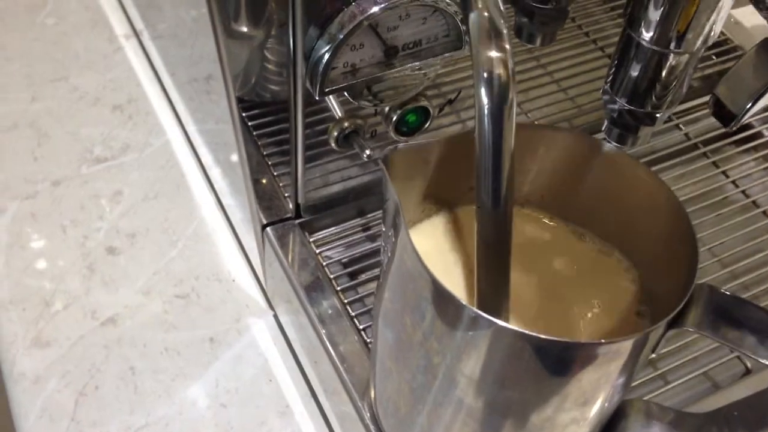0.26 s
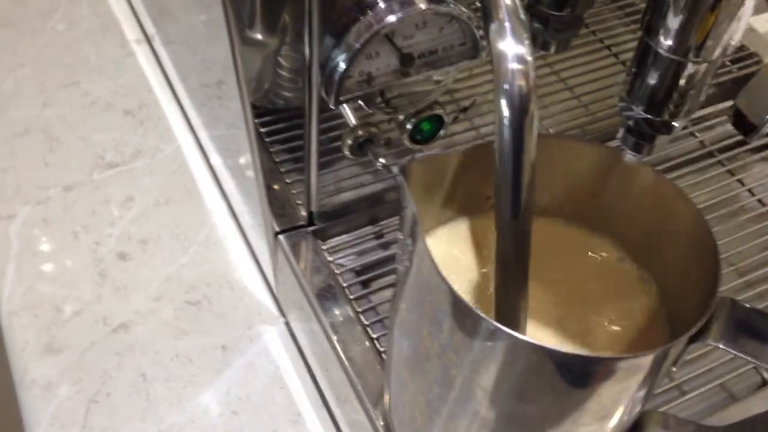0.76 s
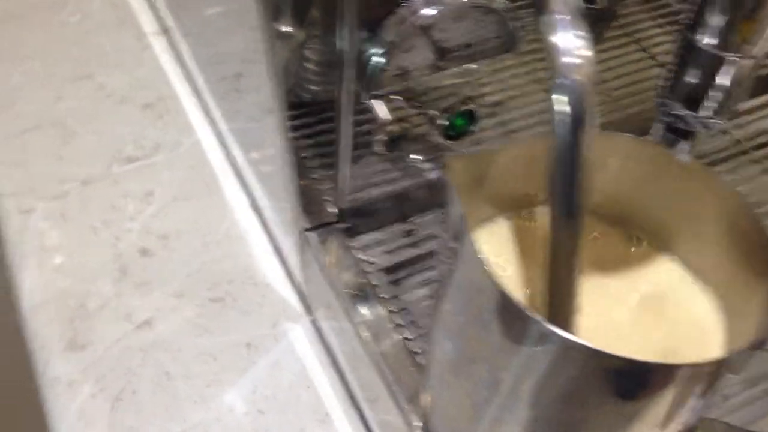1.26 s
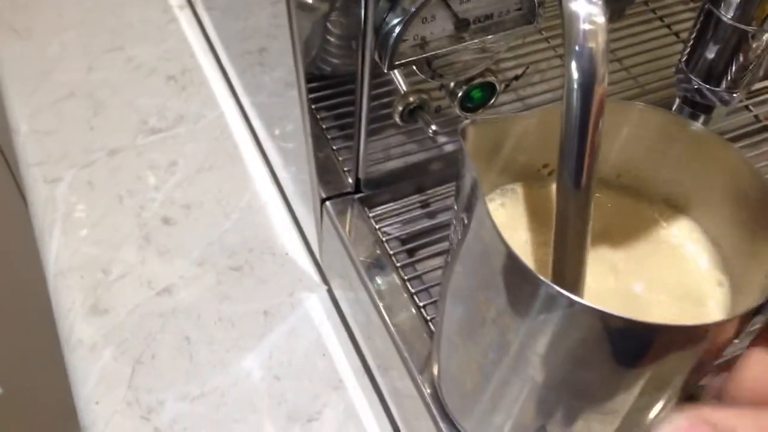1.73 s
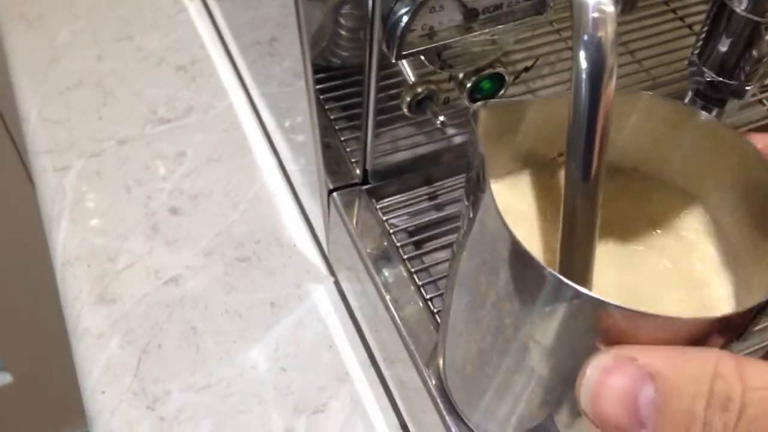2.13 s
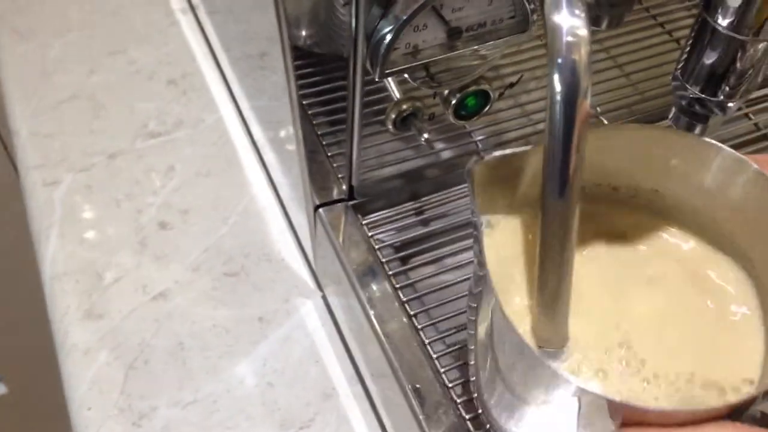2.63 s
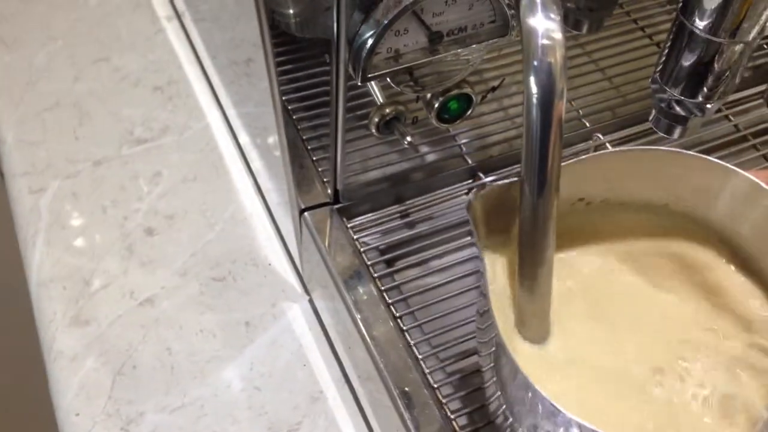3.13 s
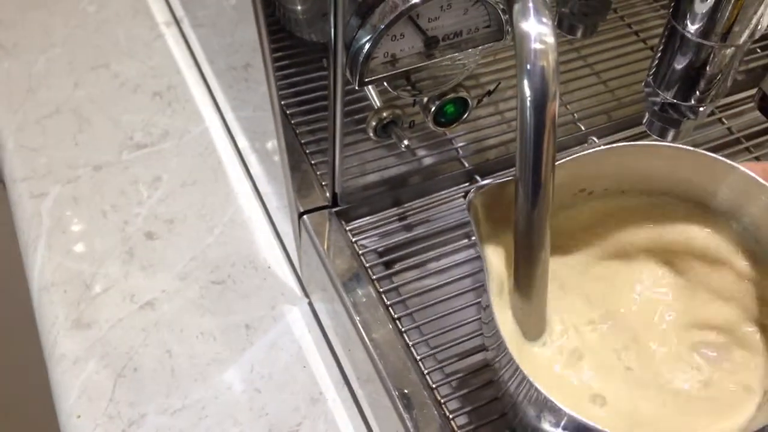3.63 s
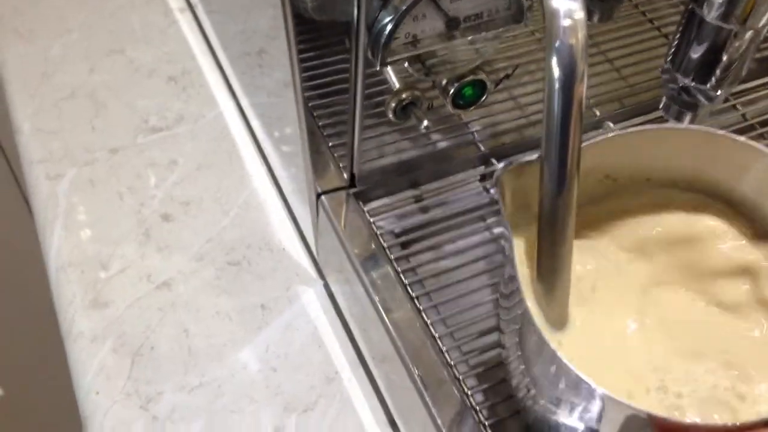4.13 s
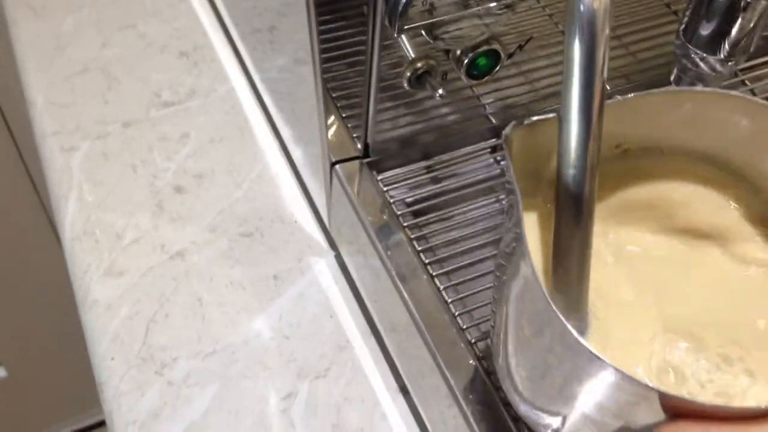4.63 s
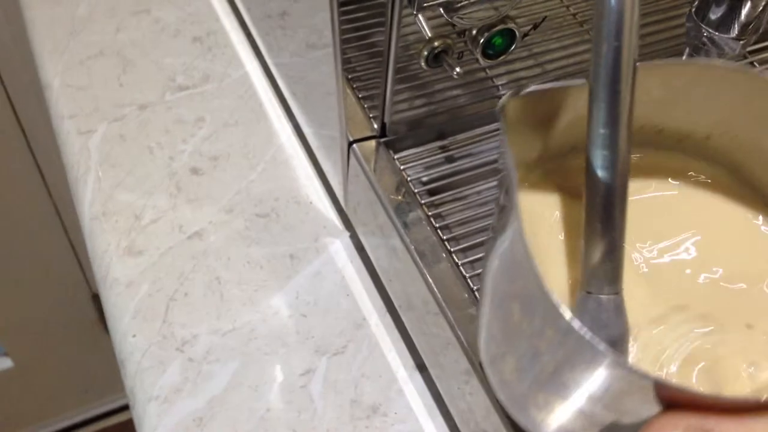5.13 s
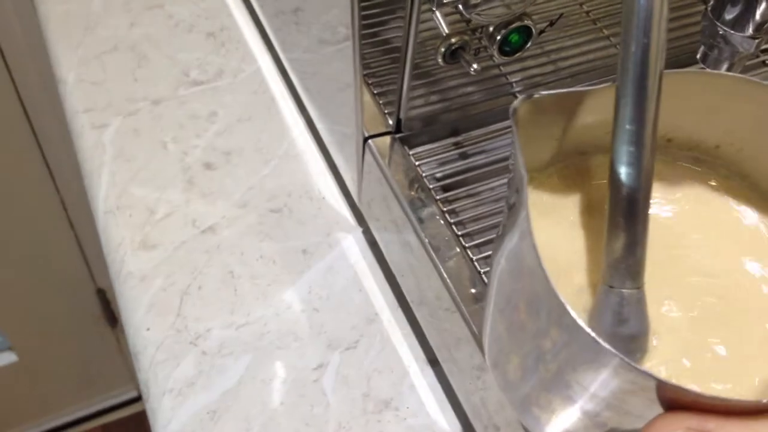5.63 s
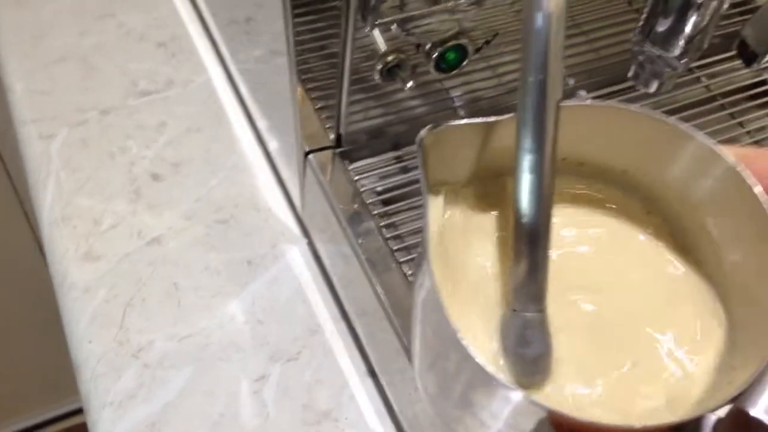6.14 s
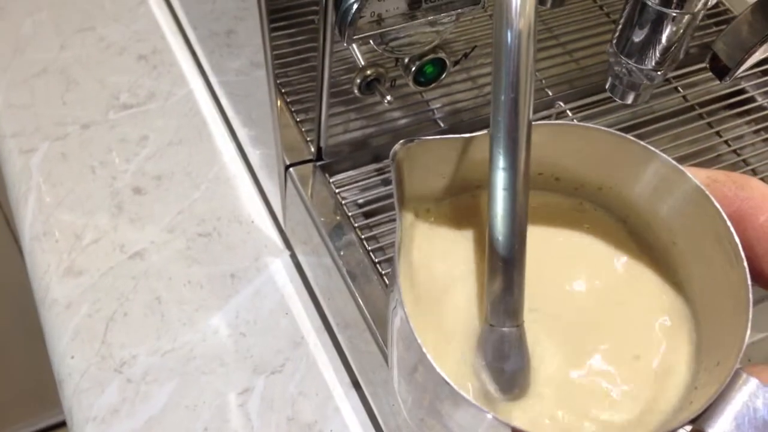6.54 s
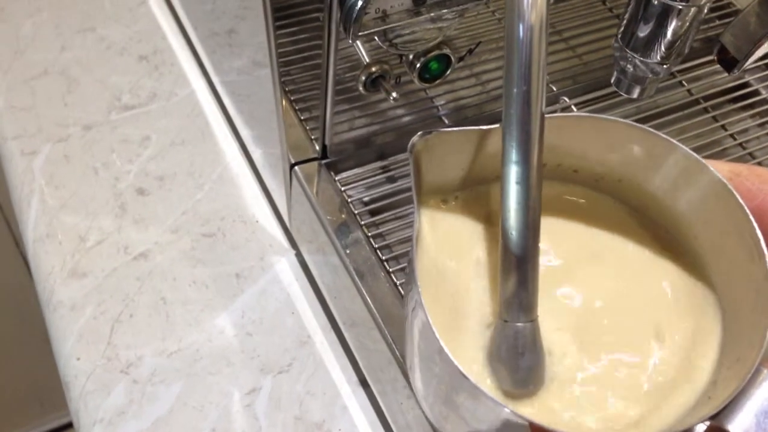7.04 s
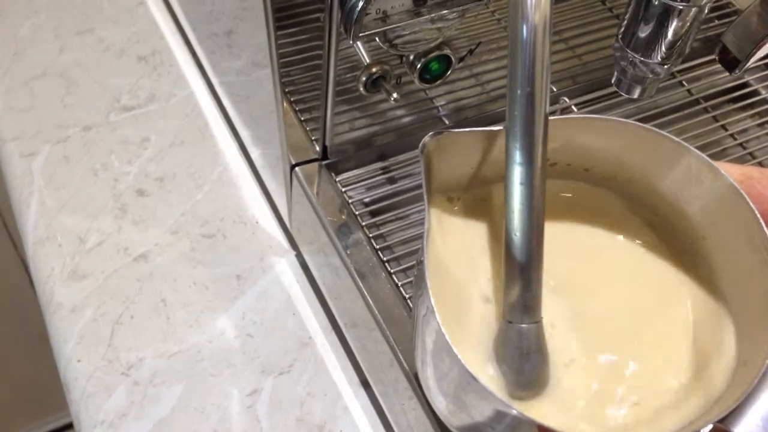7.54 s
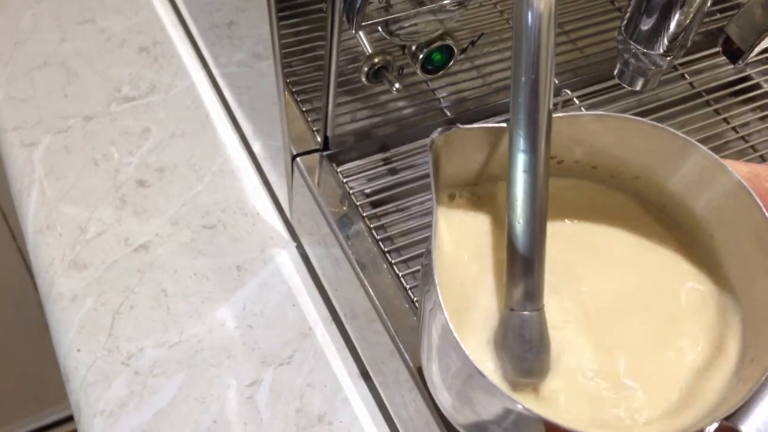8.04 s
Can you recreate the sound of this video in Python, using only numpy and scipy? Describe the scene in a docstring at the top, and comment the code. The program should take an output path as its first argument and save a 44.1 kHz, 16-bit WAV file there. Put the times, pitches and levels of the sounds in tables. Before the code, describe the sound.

Loud steam hisses and shrieks in a metal jug of milk, ringing unevenly around mid and high pitches, fluttering and spluttering. Near five seconds it falters, whistles for a tenth of a second, and abruptly turns into an even, damped sizzle. Irregular crisp tearing crackles and tiny squeaky gurgles follow while the sizzle slowly fades a little. Recorded close with a small microphone, short hard room reflections, faint low hum behind.

```python
"""A kitchen, close up: a steam wand heats milk in a steel pitcher.
Random clicks of collapsing bubbles excite the pitcher's resonances: a sputtering screech with jet hiss,
while noise churns below, short squeals break out and faint low tones waver in the background.
After five seconds, just past a brief whistle, the screech gives way to a foam-muffled sizzle, and
bursts of bright crackle follow as the tip gulps air. Close echoes and a short tail set it in the room."""
import sys
import numpy as np
from scipy import signal
from scipy.fft import rfft, irfft
from scipy.io import wavfile
from scipy.ndimage import uniform_filter1d, minimum_filter1d, map_coordinates

SR = 44100
rng = np.random.default_rng(int(sys.argv[2]) if len(sys.argv) > 2 else 0)


def generate_wav(sig):
    """Save sig (samples, or channels by samples) to the path in sys.argv[1] as 16-bit PCM at SR."""
    pcm = np.round(np.clip(np.atleast_2d(sig).T, -1, 1) * 32767).astype(np.int16)
    wavfile.write(sys.argv[1], SR, pcm)


N = 365148
TIME = np.arange(N) / SR
FOAM_S = 5.215  # foam closes over the tip


def gain_of(db):
    """Decibels to amplitude."""
    return 10 ** (np.asarray(db) / 20)


def evened(x):
    """Scales to an rms of 1."""
    return x / np.sqrt(np.mean(x ** 2) + 1e-20)


def steadied(x):
    """Holds the rms near 1 over about a fifth of a second and leaves faster flutter in."""
    power = np.abs(uniform_filter1d(x ** 2, size=8000))
    return x / np.sqrt(power + 1e-20)


def curves(rows):
    """Each column of a table after the time, joined by straight lines."""
    s, *columns = np.transpose(rows)
    return [np.interp(TIME, s, column) for column in columns]


def swells(rows):
    """Bell-shaped rises or dips in level [dB], from rows of (centre [s], length [s], level [dB])."""
    return sum(db * np.exp(-(2 * (TIME - s) / length) ** 2) for s, length, db in rows)


def sinking(start, end):
    """A straight glide from the start until the foam closes over the tip."""
    return np.interp(TIME, [0, FOAM_S], [start, end])


def foam():
    """How far the foam has closed over the tip, 0-1."""
    return np.interp(TIME, [FOAM_S - .01, FOAM_S + .01], [0, 1])


def add(mix, s, sound):
    """Mixes a sound in at a time [s]."""
    part = mix[max(round(s * SR), 0):][:len(sound)]
    part += sound[:len(part)]


def wander(rate_hz):
    """A smooth random drift with an rms of 1, from noise with its faster motion removed."""
    spectrum = rfft(rng.standard_normal(N))
    hz = np.fft.rfftfreq(N, 1 / SR)
    return evened(irfft(spectrum * np.exp(-(hz / rate_hz) ** 2), N))


def flutter(slow_hz, fast_hz, depth_db):
    """A random gain that varies between two rates; the depth is its rms in dB."""
    band = signal.butter(2, [slow_hz, fast_hz], "bandpass", fs=SR, output="sos")
    return gain_of(depth_db * evened(signal.sosfilt(band, rng.standard_normal(N))))


def collapses(per_s, spread_db, wash):
    """Clicks of imploding bubbles, a few of them large, over a wash of countless small ones."""
    size = gain_of(spread_db * np.minimum(rng.exponential(1, N), 4))
    struck = rng.random(N) < per_s / SR
    clicks = size * np.sign(rng.standard_normal(N)) * struck
    return evened(evened(clicks) + wash * rng.standard_normal(N))


def coloured(x, spectrum, size=2048):
    """Minimum-phase filter with the given spectrum (Hz, relative dB); the result has an rms of 1."""
    hz, db = np.transpose(spectrum)
    bin_hz = abs(np.fft.fftfreq(size, 1 / SR))
    log_gain = np.log(gain_of(np.interp(np.log(bin_hz + 1), np.log(hz), db)))
    # the Hilbert transform of the log gain supplies the phase that makes the filter causal
    taps = np.fft.ifft(np.exp(np.conj(signal.hilbert(log_gain)))).real
    return evened(signal.oaconvolve(x, taps[:size // 2])[:len(x)])


def patchy(x, patch_db):
    """The colour of churned liquid keeps changing: random patches some 700 Hz wide and 50 ms long."""
    z = signal.stft(x, nperseg=256)[2]
    field = rng.standard_normal(z.shape)
    field = uniform_filter1d(field, size=4, axis=0)
    field = uniform_filter1d(field, size=16, axis=1)
    return evened(signal.istft(z * gain_of(patch_db * evened(field)), nperseg=256)[1][:N])


def resonate(x, hz, width):
    """A steep two-pole resonance that can follow a moving pitch: shift down, smooth, shift back up."""
    turn = np.exp(2j * np.pi * np.cumsum(hz * np.ones(len(x))) / SR)
    r = np.exp(-np.pi * width / SR)
    smooth = signal.lfilter([(1 - r) ** 2], [1, -2 * r, r * r], x / turn)
    return 2 * (turn * smooth).real


def notch(x, hz, width, depth):
    """A resonance, taken away, leaves a dip that can move."""
    turn = np.exp(2j * np.pi * np.cumsum(hz) / SR)
    r = np.exp(-np.pi * width / SR)
    resonance = 2 * (turn * signal.lfilter([1 - r], [1, -r], x / turn)).real
    return x - np.clip(depth, 0, 1) * resonance


def ring(x, hz, modes):
    """Resonances (multiple, width [Hz], level [dB]) that move together and each waver a little."""
    out = 0
    for k, (ratio, width, db) in enumerate(modes):
        pitch = hz * ratio * (1 + .014 * wander(12))
        # each mode hears the drive 60 samples later than the one before
        out = out + gain_of(db) * resonate(np.roll(x, 60 * k), pitch, width)
    return out


def above(x, hz):
    """A steep high-pass, as the pitcher's narrow mouth radiates little of the lows."""
    return signal.sosfilt(signal.butter(8, hz, "highpass", fs=SR, output="sos"), x)


def screech():
    """The steam cavity sputters in thin milk; its collapses ring the pitcher until foam damps them."""
    # as the tip sinks, layer levels: (time [s], lowest resonance [dB], second resonance [dB],
    # roar of collapsing bubbles [dB], jet hiss [dB])
    layer_levels = [(0, -23, -24, -23.5, -19.5), (.35, -19.5, -37, -23, -22), (.7, -25.5, -25, -19, -18.5),
                    (1.3, -34.5, -40, -20.5, -22.5), (1.9, -27.5, -29, -18.5, -23),
                    (2.3, -32.5, -45, -23, -23), (2.7, -26, -57, -17, -22.5),
                    (3.05, -21.5, -27.5, -22.5, -18.5), (3.45, -21.5, -28, -21.5, -19),
                    (3.9, -25.5, -28, -23, -21), (4.3, -21, -24.5, -21, -19), (4.65, -20, -22, -27.5, -19),
                    (4.95, -24, -22.5, -25.5, -19.5), (5.2, -28, -21.5, -28, -19.5)]
    # shifting as the pitcher is lifted: (time [s], lowest resonance [Hz], third resonance [Hz],
    # pitch of the bubbles [Hz], nozzle tone [Hz])
    pitch_path = [(0, 1420, 2160, 2180, 4400), (.2, 1638, 2240, 2180, 4980), (.45, 1705, 2290, 2190, 4730),
                  (.7, 1516, 2320, 2230, 4960), (.95, 1380, 2330, 2400, 5030),
                  (1.4, 1488, 2225, 2800, 4800), (1.9, 1465, 2375, 2670, 4780),
                  (2.15, 1387, 2360, 2680, 4750), (2.7, 1387, 2260, 2740, 5200),
                  (3.15, 1410, 2554, 2770, 4500), (3.5, 1395, 2455, 2720, 4640),
                  (3.9, 1410, 2340, 2300, 5000), (4.15, 1333, 2380, 2210, 4900),
                  (4.55, 1300, 2255, 2140, 4390), (5.2, 1260, 2250, 2100, 4480)]
    # the pitcher's upper ring: (multiple of the third resonance, width [Hz], relative level [dB])
    upper_modes = [(0.996, 232, 5), (1.12, 264, -5.5), (1.245, 240, 3.5), (1.36, 287, -1.5)]
    # colour of the jet hiss: (frequency [Hz], relative level [dB])
    jet_spectrum = [(80, -39), (400, -35.5), (1100, -25), (1600, 7), (2200, 7), (3100, -0.5), (3550, 5.5),
                    (4100, 3), (5800, -1), (6300, 0), (7000, 2.5), (7700, 0), (8300, -4.5), (9500, -3.5),
                    (11500, -9.5), (15300, -14)]
    # an echo off the milk surface cancels one band of the steam: (time [s], centre [Hz], depth [0-1])
    hollow_path = [(0, 3800, 0), (.35, 3500, 0.4), (.95, 3550, 0.47), (1.4, 3930, 0), (2.2, 4000, 0.2),
                   (2.75, 3550, 1), (3.3, 3600, 0.8), (4.0, 3750, 0.55), (4.7, 3500, 0.73),
                   (5.2, 4050, 0.65)]
    # the jet flares and the nozzle sings out: (centre [s], length [s], rise of the nozzle tone [dB])
    flare_rows = [(.33, 0.12, 3.5), (.49, .07, 6), (.68, 0.056, 8), (.926, 0.14, 10), (1.139, 0.047, 4.5),
                  (1.393, 0.029, 6.5), (1.9, .09, 6), (2.09, 0.12, 8), (3.08, 0.087, 6.5), (3.265, 0.13, 4),
                  (3.61, .06, 4), (3.975, 0.029, 9.5), (4.55, 0.11, 7), (5.146, 0.041, 7)]
    # clumps of large bubbles thump the two low resonances: (centre [s], length [s], rise [dB])
    splutter_rows = [(.113, 0.026, 8), (.413, 0.085, 7), (1.137, 0.041, 5), (1.482, 0.063, 3.5),
                     (2.04, 0.04, 9), (2.369, 0.12, 6.5), (.72, 0.027, 3), (2.86, 0.048, 4.5),
                     (3.149, .08, 2.5), (3.345, 0.021, 8.5), (3.69, 0.084, 3), (3.82, 0.026, 5),
                     (4.114, 0.047, 3.5), (4.55, 0.054, 2.5), (4.767, 0.013, 2.5), (4.835, 0.024, 8.5),
                     (4.88, .02, 6), (5.209, 0.012, 9.5)]
    low_width_hz, second_width_hz = 114, 170  # how sharply the two low resonances ring
    nozzle_db = -26.5  # the nozzle's steady singing between flares
    flare_hiss = 0.24  # share of a flare's dB that the hiss follows

    low_db, second_db, roar_db, jet_db = curves(layer_levels)
    low_hz, third_hz, bubble_hz, nozzle_hz = curves(pitch_path)
    hollow_hz, hollow_depth = curves(hollow_path)
    flare_db, splutter_db = swells(flare_rows), swells(splutter_rows)

    sputter = flutter(11.8, 78, depth_db=1.4)
    drive = collapses(per_s=3500, spread_db=1.0, wash=1.0) * sputter
    throb = drive * flutter(10, 100, depth_db=2.3)  # the largest bubbles come in clumps

    low_pitch = low_hz * (1 + 0.0057 * wander(24))
    low = above(resonate(throb, low_pitch, low_width_hz), 1290)
    # the second resonance climbs; its opposite sign leaves a hollow between the two
    second = above(resonate(-throb, sinking(1716, 1837), second_width_hz), 1050)

    bubbles = patchy(resonate(drive, bubble_hz, 1730), patch_db=1.0)
    roar = above(ring(bubbles, third_hz, upper_modes), 1880)

    nozzle_drive = drive * flutter(7.1, 57, depth_db=3.0)
    nozzle_pitch = nozzle_hz * (1 + 0.034 * wander(26))
    nozzle = above(resonate(nozzle_drive, nozzle_pitch, 560), 3030)

    jet_drive = collapses(per_s=6000, spread_db=2.5, wash=0.74) * sputter
    jet = patchy(coloured(jet_drive, jet_spectrum), patch_db=3.0)

    layers = [(low, low_db + splutter_db), (second, second_db + splutter_db), (roar, roar_db),
              (nozzle, nozzle_db + flare_db), (jet, jet_db + flare_hiss * flare_db)]
    steam = sum(gain_of(db) * steadied(sound) for sound, db in layers)
    steam = notch(steam, hollow_hz, 480, hollow_depth)
    # a dip just above the lowest resonance moves with it and deepens
    steam = notch(steam, 1.185 * low_hz, 170, sinking(.25, .65))
    return steam * (1 - foam())


def squeals(glide=-0.0318):
    """A cloud of like-sized bubbles rings together for a moment, wavering and sagging in pitch."""
    # squeals and gurgles: (time [s], length [s], pitch [Hz], nominal width [Hz], level [dB])
    squeal_rows = [(0, .03, 3350, 260, -17), (.07, .28, 2174, 140, -27), (.299, .087, 4880, 200, -23.5),
                   (.568, 0.036, 236, 110, -52), (0.601, 0.032, 2240, 130, -20),
                   (1.292, .2, 3184, 350, -21.5), (1.857, 0.083, 209, 70, -57),
                   (2.322, 0.055, 434, 196, -44.5), (3.103, 0.071, 414, 160, -47.5),
                   (3.3, 0.61, 409, 128, -59), (3.65, 0.062, 1814, 250, -16), (4.194, .17, 207.2, 70, -59),
                   (4.514, 0.15, 4290, 280, -24.5), (4.763, 0.0075, 1884, 280, -14.5),
                   (4.818, .019, 2110, 500, -22), (4.985, .15, 1285, 45, -23.5),
                   (5.113, .068, 4540, 220, -20), (5.243, .055, 2900, 600, -27.5),
                   (5.257, 0.023, 1002, 297, -39), (5.316, .021, 2025, 450, -22.5),
                   (5.339, 0.047, 2300, 600, -26.5), (5.526, 0.043, 3190, 300, -28),
                   (5.579, 0.091, 2100, 550, -27), (5.732, 0.019, 807, 200, -34),
                   (5.732, 0.0194, 1350, 253, -26.5), (6.297, 0.11, 3090, 370, -25),
                   (6.341, 0.078, 1412, 290, -33.5), (6.485, .019, 766, 345, -42),
                   (6.64, 0.044, 3426, 475, -21.5), (6.71, 0.027, 650, 352, -42.5),
                   (7.315, .04, 3230, 593, -31), (7.536, .016, 832, 280, -40),
                   (7.911, .012, 1248, 400, -30.5), (7.921, .008, 797, 397, -37),
                   (8.109, .019, 1520, 300, -28.5)]
    out = np.zeros(N)
    t = np.arange(SR) / SR
    for s, length, hz, width, db in squeal_rows:
        # pitch and loudness wander faster the wider the cloud is
        smooth = signal.butter(4, width * 0.592, fs=SR, output="sos")
        drifts = signal.sosfilt(smooth, rng.standard_normal((2, 2 * SR)))
        waver, swell = (evened(drift[-SR:]) for drift in drifts)
        sag = glide * (np.minimum(t / length, 1) - .5)
        pitch = hz * (1 + sag) + 0.417 * width * waver
        cloud = evened(np.sin(2 * np.pi * np.cumsum(pitch) / SR) * (1 + .5 * swell))
        rise_s = .002 + 0.3 * length  # long squeals grow slowly out of the hiss
        fall_s = .005 + 0.25 * length  # and linger longer
        shape = np.minimum(t / rise_s, 1) * np.exp(-np.maximum(t - length, 0) / fall_s)
        add(out, s - rise_s / 3, gain_of(db) * cloud * shape)
    return out


def churn():
    """The low, lumpy rush of whirling milk: fluttering noise under a low-pitched colour."""
    # loudness of the rush: (time [s], level [dB])
    churn_levels = [(0, -46.5), (2.2, -49), (2.7, -52.5), (3.17, -48), (3.7, -55), (4.1, -54), (4.3, -49),
                    (4.6, -56), (5.05, -51.5), (5.5, -58), (6.5, -54.5), (7.1, -55.5), (8.28, -54.5)]
    # colour of the rush: (frequency [Hz], relative level [dB])
    rumble_spectrum = [(25, -48), (80, -34), (120, -11), (210, -2), (290, -2.5), (380, 0), (490, 0.5),
                       (600, -0.5), (740, 2.5), (920, -5.5), (1100, 5.5), (1500, -11)]
    level_db, = curves(churn_levels)
    lumpy = rng.standard_normal(N) * flutter(8.1, 40, depth_db=1.2)
    return gain_of(level_db) * coloured(lumpy, rumble_spectrum, size=8192)


def spray():
    """Tiny droplets fizz off the surface where the tip lies shallow: fluttering, treble-rich clicks."""
    # fine spray off the surface: (time [s], level [dB])
    spray_levels = [(0, -26), (.7, -44), (5.03, -41), (5.14, -30), (5.26, -28), (5.4, -44), (5.44, -21),
                    (5.53, -32), (5.78, -31), (6.05, -53)]
    level_db, = curves(spray_levels)
    drive = collapses(per_s=4000, spread_db=2.5, wash=.9) * flutter(20, 120, depth_db=2.5)
    return gain_of(level_db) * coloured(drive, [(2000, -30), (8000, -13), (11500, -7.5), (15000, -13.5)])


def background():
    """Faint low tones, sines wavering by 2 Hz rms, over the low rumble of the room."""
    # wavering low tones: (frequency [Hz], rms level [dB])
    tone_rows = [(70, -86), (140, -82.5), (212, -75.5), (404, -84), (501, -71.5), (737, -67.5),
                 (855, -66.5)]
    tones = 0
    for hz, db in tone_rows:
        phase = 2 * np.pi * np.cumsum(hz + 2 * wander(7.7)) / SR
        tones = tones + gain_of(db) * np.sqrt(2) * np.sin(phase)
    rumble = coloured(rng.standard_normal(N), [(20, -22), (70, -3), (180, 4), (600, -20)], size=8192)
    return tones + gain_of(-90) * rumble


def level_dips():
    """A gain that briefly dips the loudness of the steam's screech, hiss and sizzle."""
    # brief bell-shaped dips in loudness: (centre [s], length [s], dip [dB])
    dip_rows = [(.8, 0.38, -3.5), (1.362, 0.036, -5), (1.579, 0.057, -4.5), (2.171, 0.032, -3),
                (2.24, 0.064, -2.5), (3.202, 0.038, -3), (3.43, 0.12, -2.5), (3.505, 0.028, -2),
                (3.75, .06, -2), (4.216, 0.034, -4), (4.754, 0.0099, -5.5), (4.79, 0.027, -3.5),
                (4.863, .014, -10), (4.92, 0.057, -5.5), (5.03, 0.13, -3), (5.67, .1, -5),
                (5.908, 0.053, -3.5), (7.17, 0.21, -4), (7.433, 0.067, -3.5), (8.079, .1, -1)]
    return gain_of(swells(dip_rows))


def whistle(start_s=4.97, length_s=0.1, note_hz=1715, edge_s=0.016, waver=.014, sag=.035):
    """The steam cavity locks into one note: a wavering tone with harmonics that sags in the middle."""
    # the first three harmonics, in order: (level [dB])
    harmonic_levels = [-16.5, -19.5, -32]
    t = TIME - start_s
    arch = np.sin(np.pi * np.clip(t / length_s, 0, 1))
    phase = 2 * np.pi * np.cumsum(note_hz * (1 - sag * arch + waver * wander(116))) / SR
    shape = np.clip(np.minimum(t, length_s - t) / edge_s + .5, 0, 1)
    note = sum(gain_of(db) * np.sin(k * phase) for k, db in enumerate(harmonic_levels, 1))
    return shape * note * gain_of(1.6 * wander(150))


def sizzle():
    """Under the foam the collapses are small and soft: even clicks in a muffled colour."""
    # the sizzle fades as the foam thickens: (time [s], level [dB])
    foaming_levels = [(5.22, -21.5), (5.45, -24), (5.85, -24), (6.2, -24), (6.6, -26.5), (7.0, -24.5),
                      (7.3, -25), (7.55, -25), (7.75, -24.5), (7.95, -28), (8.28, -27.5)]
    # colour of the sizzle: (frequency [Hz], relative level [dB])
    sizzle_spectrum = [(700, -41), (1000, -24), (1230, -6), (1750, -7.5), (2150, -9.5), (2650, -13.5),
                       (3100, 2.5), (4000, -3.5), (4900, 0), (5900, -0.5), (6700, -10), (7600, -6),
                       (8200, -12.5), (10500, -17.5), (12000, -26), (15300, -30)]
    level_db, = curves(foaming_levels)
    drive = collapses(per_s=5000, spread_db=0.0, wash=0.76) * flutter(38, 60, depth_db=1.4)
    hiss = steadied(patchy(coloured(drive, sizzle_spectrum), patch_db=2.5))
    return gain_of(level_db) * hiss * foam()


def gulps(rise_s=0.0066, fall_s=0.0075, fizz_db=-13, fizz_s=0.063):
    """The tip breaks the surface: air tears in with a bright crackle that dies into a short fizz."""
    # the tip sucks in air: (time [s], length [s], level before the common 2.5 dB lift [dB])
    gulp_rows = [(5.42, 0.13, -23), (5.553, 0.13, -27.5), (5.702, 0.12, -22.5), (5.914, 0.076, -26),
                 (6.075, 0.015, -22), (6.196, .01, -27), (6.218, .008, -23.5), (6.266, .007, -30),
                 (6.421, 0.061, -29.5), (6.481, 0.048, -20), (6.538, 0.047, -17), (6.704, 0.11, -22.5),
                 (6.936, .019, -21), (6.958, 0.035, -14.5), (7.119, .008, -28), (7.186, 0.0072, -28.5),
                 (7.293, .012, -28), (7.54, 0.0098, -25.5), (7.597, 0.0087, -25), (7.735, .009, -28),
                 (7.755, .008, -27), (7.908, 0.072, -21.5), (8.041, .008, -27), (8.128, 0.11, -21)]
    # colour of the torn air: (frequency [Hz], relative level [dB])
    gulp_spectrum = [(30, -55), (90, -44), (170, -25), (500, -22), (900, -13), (1300, -19), (2600, -46),
                     (3300, 9), (4500, -4), (5600, 8), (6700, -1.5), (7600, 4.5), (8400, 1), (10000, 3),
                     (15300, 0)]
    power = np.zeros(N)
    t = np.arange(SR // 2) / SR
    for s, length, db in gulp_rows:
        closed = np.maximum(t - length, 0)  # time since the gap closed
        fizz = gain_of(fizz_db) * np.exp(-closed / fizz_s)
        opening = np.minimum(t / rise_s, 1) * np.maximum(np.exp(-closed / fall_s), fizz)
        add(power, s - rise_s / 2, (gain_of(db) * opening) ** 2)
    drive = collapses(per_s=4500, spread_db=4.0, wash=0.98) * flutter(28, 150, depth_db=2.0)
    return gain_of(2.5) * np.sqrt(power) * patchy(coloured(drive, gulp_spectrum), patch_db=3.5)


def kitchen(x, t60=0.29, wet_db=-15, sway=0.0416):
    """Near echoes that drift as the hand moves, plus a dense, quickly dying tail of noise."""
    # echoes off the pitcher wall and the steel front: (mean delay [ms], level [dB])
    echo_rows = [(1.9, -15), (3.4, -14), (5.302, -19.5), (8.1, -17)]
    short_waves = above(x, 2020)  # long waves bend around the small surfaces
    near = x
    for ms, db in echo_rows:
        delay = SR * ms / 1000 * (1 + sway * wander(.7))  # in samples
        near = near + gain_of(db) * map_coordinates(short_waves, [np.arange(N) - delay], order=3)
    t = np.arange(SR // 3) / SR
    taps = rng.standard_normal(len(t)) * gain_of(-60 * t / t60) * (t > .002)
    tail = signal.oaconvolve(x, taps / np.linalg.norm(taps))[:N]
    return near + gain_of(wet_db) * tail


def scene():
    """All the sounds of the pitcher, in the room, with faint tones and rumble behind them."""
    steam = (screech() + sizzle()) * level_dips()
    pitcher = steam + whistle() + spray() + gulps() + squeals() + churn()
    return (kitchen(pitcher) + background())[None]


def record(dry, bass_cut_hz=65, ceiling_db=-2.5, edge_hz=15600):
    """A small microphone loses the deep bass, a quick limiter holds the peaks down; then a low-pass."""
    thin = signal.sosfilt(signal.butter(2, bass_cut_hz, "highpass", fs=SR, output="sos"), dry)
    # the limiter's gain dips around each peak, smoothed on both sides
    allowed = np.minimum(gain_of(ceiling_db) / (abs(thin) + 1e-9), 1)
    allowed = minimum_filter1d(allowed, size=260)
    held = thin * uniform_filter1d(uniform_filter1d(allowed, size=150), size=110)
    low_pass = signal.firwin(511, edge_hz, window=("kaiser", 9), fs=SR)
    return signal.oaconvolve(held, low_pass[None], "same")


dry = scene()
out = record(dry)
generate_wav(out)
```